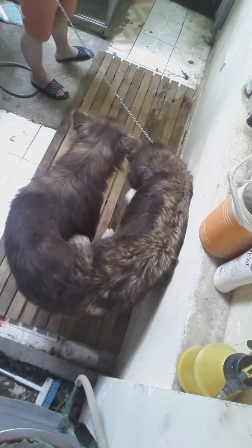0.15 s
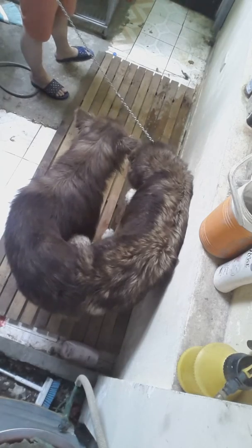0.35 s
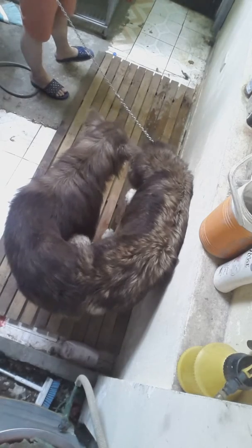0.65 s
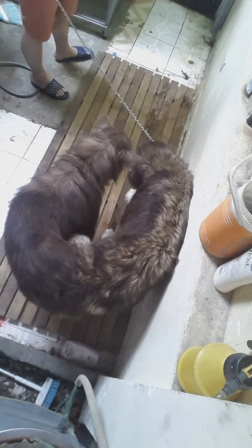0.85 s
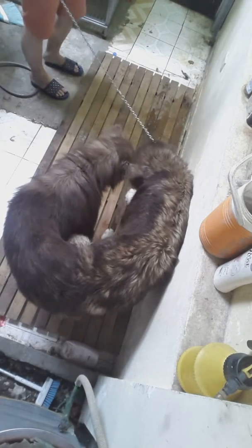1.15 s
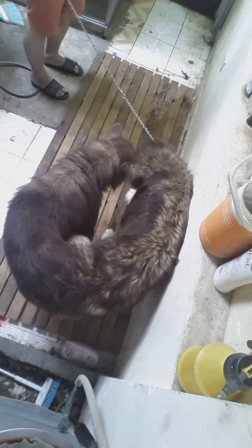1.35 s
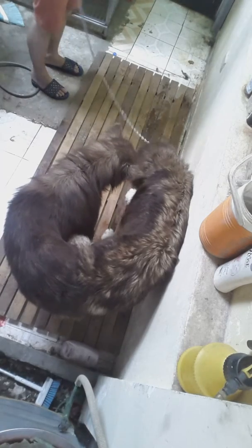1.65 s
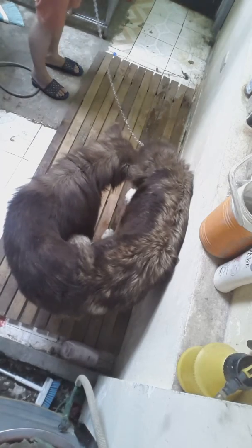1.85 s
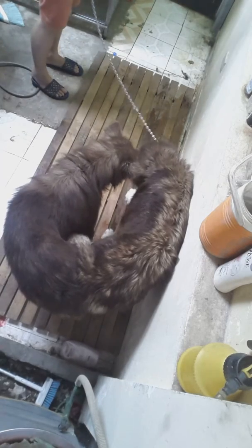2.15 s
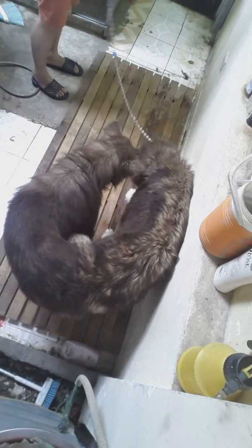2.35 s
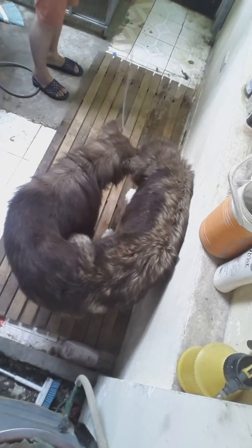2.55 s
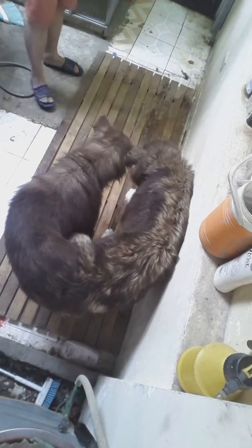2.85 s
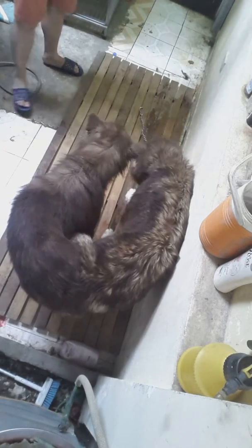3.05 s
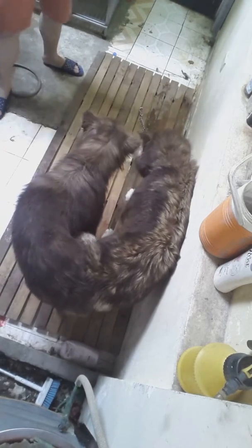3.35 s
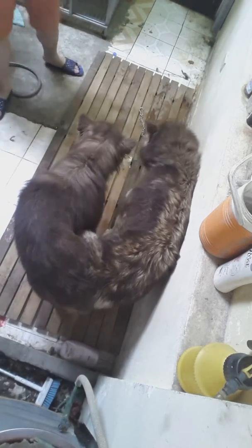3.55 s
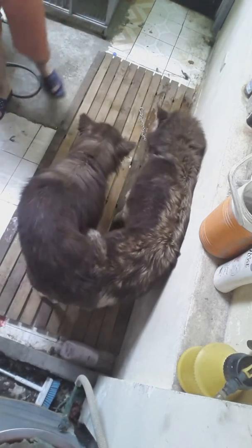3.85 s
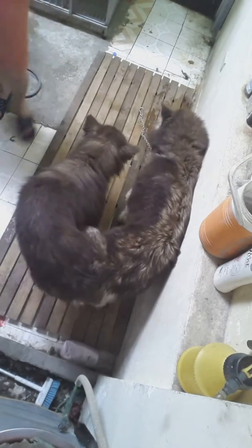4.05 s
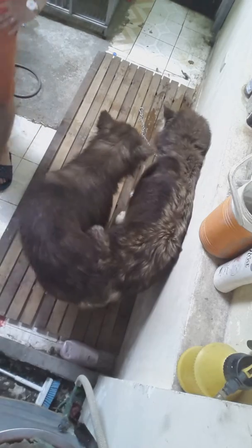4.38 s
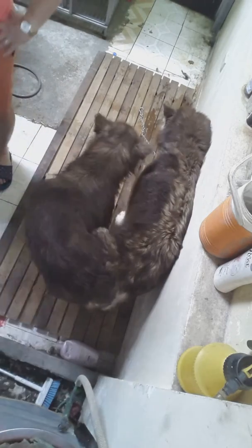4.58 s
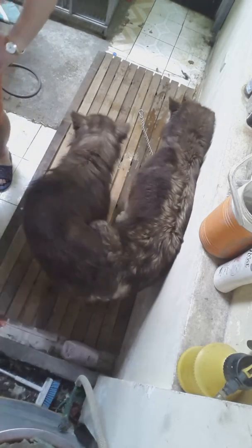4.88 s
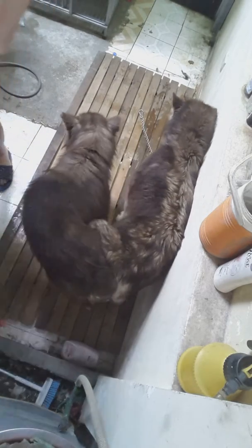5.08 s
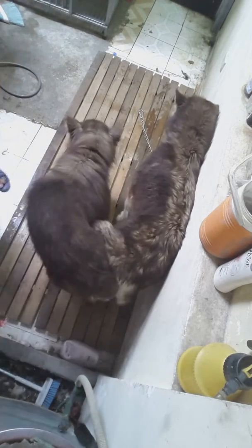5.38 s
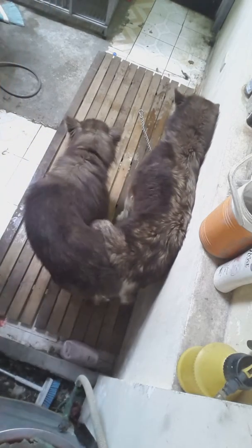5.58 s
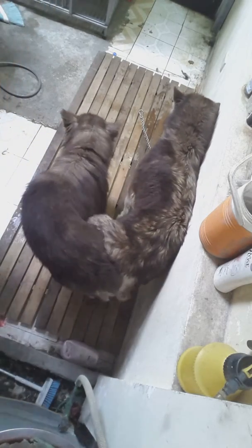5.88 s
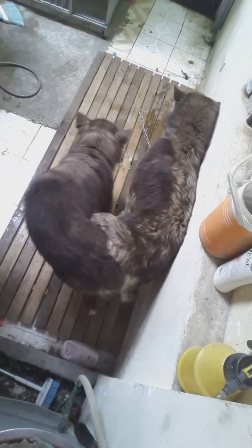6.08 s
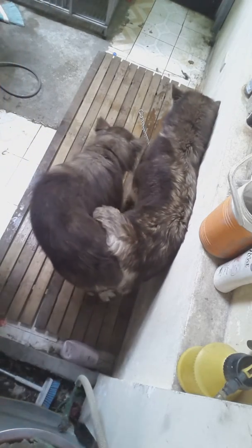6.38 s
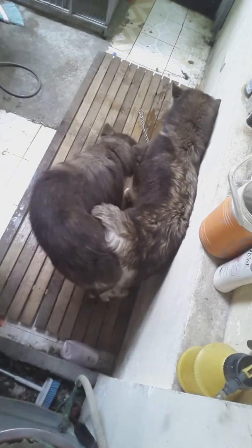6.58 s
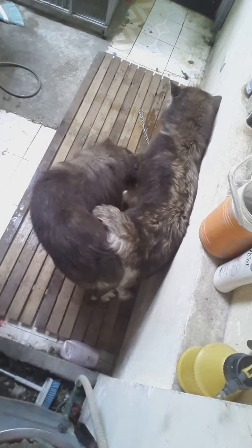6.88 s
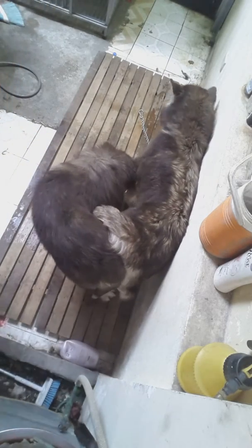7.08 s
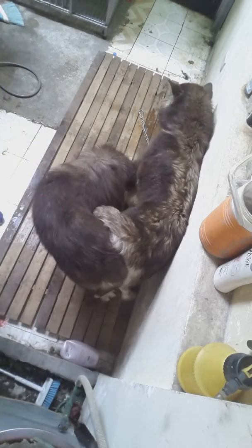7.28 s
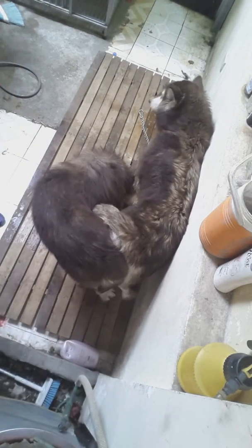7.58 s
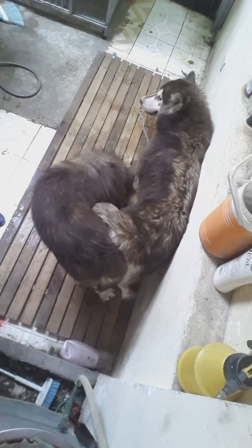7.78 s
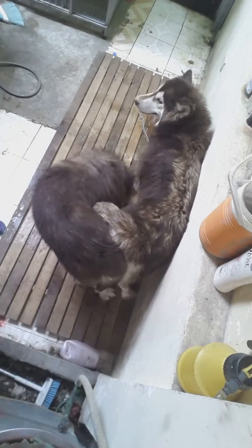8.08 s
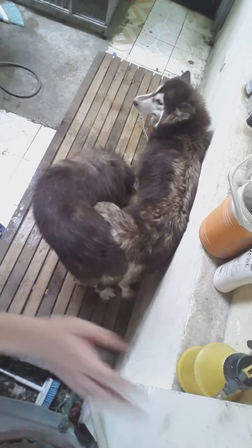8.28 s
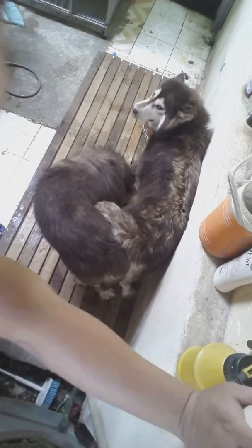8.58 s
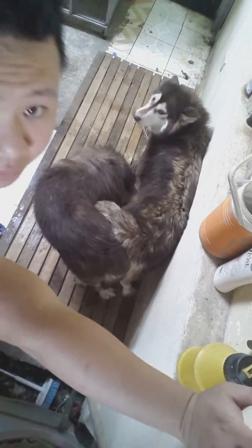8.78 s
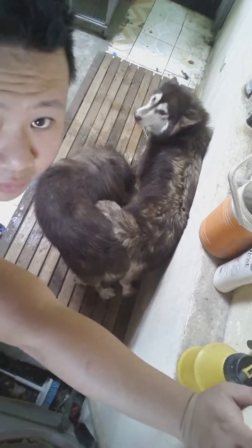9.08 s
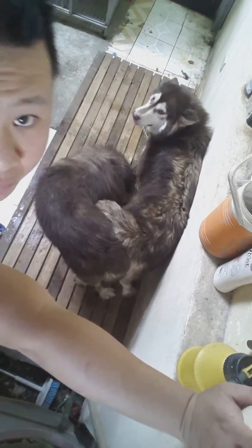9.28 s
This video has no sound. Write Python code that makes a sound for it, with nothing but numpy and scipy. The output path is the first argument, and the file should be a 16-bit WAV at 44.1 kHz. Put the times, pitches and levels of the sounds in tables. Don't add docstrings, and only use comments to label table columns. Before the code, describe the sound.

Throughout, two fans blow in a tiled wash room: broad air rush, low casing hum and steady whines near 1.1 kHz that surge slightly and beat together. From 1 to 2.5 seconds there are small sharp ticks, faint fur and cloth rustles and one tiny high chime. At 2.76 a metal chain crashes onto wooden slats: a bright crack, dense link clatter, clasp rattle and hollow wood knocks. The stereo phone microphone ducks abruptly, bass nearly vanishing briefly; a loose end follows at 3.0, and the fan noise steps back up from 3.6 to full by about 4.1. A light rattle at 4.48 leads to a second fall at 4.53, small bounces, and a third sharp fall at 4.8. Short drags scrape from 5.2 to 5.5. Afterward the fans dominate, with soft rustles near 6, 7.1 and 8.7, a faint chime at 8.2 and sparse ticks until past 9.

```python
import sys
import numpy as np
from scipy import signal
from scipy.fft import rfft, irfft, next_fast_len
from scipy.io import wavfile
from scipy.ndimage import uniform_filter1d

SR = 44100
rng = np.random.default_rng(int(sys.argv[2]) if len(sys.argv) > 2 else 0)


def decibels_to_gain(level_db):
    exponent = np.asarray(level_db, float) / 20
    return 10 ** exponent


def store_wav(level_fs):
    pcm = np.round(np.clip(np.atleast_2d(level_fs), -1, 1) * 32767)
    wavfile.write(sys.argv[1], SR, pcm.T.astype(np.int16))


N = 415863
T = np.arange(N) / SR
PADDED = next_fast_len(N)
HZ = np.maximum(np.fft.rfftfreq(PADDED, 1 / SR), 1)


def unit(x):
    return x / np.sqrt(np.mean(x ** 2))


def over_hz(points):
    hz, value = np.transpose(points)
    return np.interp(np.log(HZ), np.log(hz), value, left=value[0], right=value[-1])


def bell(hz, width):
    return 1 / np.sqrt(1 + ((HZ - hz ** 2 / HZ) / width) ** 2)


def colour(x, gain):
    return irfft(rfft(x, PADDED) * gain, PADDED)[..., :N]


def walk(rate):
    k = int(SR / rate)
    steps = np.repeat(rng.standard_normal(N // k + 1), k)
    return 1.3 * uniform_filter1d(uniform_filter1d(steps, k), k)[:N]


def diffuse():
    # (frequency [Hz], likeness [0-1])
    likeness = [(60, 1), (130, 0.91), (290, 0.94), (630, 0.34), (1370, 0), (2980, 0), (6510, 0), (14200, 0)]
    like = np.clip(over_hz(likeness), 0, .95)
    mid, side = rfft(rng.standard_normal((2, PADDED)))
    mid = mid * np.sqrt((1 + like) / 2)
    side = side * np.sqrt((1 - like) / 2)
    return irfft(np.array([mid + side, mid - side]), PADDED)[:, :N]


def grit(rate, scatter_db, smear_s):
    hits = (rng.random(N) < rate / SR) * decibels_to_gain(scatter_db * rng.exponential(size=N))
    smeared = signal.lfilter([1], [1, -np.exp(-1 / (smear_s * SR))], hits ** 2)
    return unit(np.sqrt(smeared))


def ring(modes):
    return unit(colour(diffuse(), sum(decibels_to_gain(db) * bell(hz, width) ** 2 for hz, width, db in modes)))


def ducking():
    rest_db, duck_db, step_db = 0.52, -13, -3.5
    duck_s, held_until_s = 2.752, 3.64
    step_s, creep_s = .13, .3
    corners = np.cumsum([duck_s - .01, .02, held_until_s - duck_s - .01, step_s, creep_s])
    return np.interp(T, corners, [rest_db, duck_db, duck_db, step_db, rest_db])


def falls(rows, law, own=False):
    layer_db, rise_s, share = law
    power = 0
    for s, db, hold_s, fade_db, *own_db in rows:
        age = np.maximum(T - s, 0)
        fade = share * fade_db * np.maximum(age - hold_s, 0)
        level_db = db + layer_db + own * sum(own_db) - fade
        power = power + (decibels_to_gain(level_db) * (1 - np.exp(-age / rise_s))) ** 2
    return np.sqrt(power)


def chain(links, hiss):
    # (time [s], clatter [dB], tumbling [s], fade [dB/s], link ring [dB])
    drops = [
        (2.763, -17, 0.087, 107, -25),
        (2.99, -28.5, 0.057, 138, -19.5),
        (4.478, -41, 0.0092, 300, -6),
        (4.495, -32.5, 0.035, 300, -8),
        (4.529, -24, 0.063, 97, -20.5),
        (4.68, -31, 0.017, 100, -40),
        (4.74, -33.5, .03, 144.5, -38),
        (4.789, -25.5, 0.063, 147, -22),
    ]
    # (time [s], clatter [dB], tumbling [s], fade [dB/s], fine hiss [dB])
    scuffs = [
        (5.19, -39, 0.058, 130, -10),
        (5.32, -40.5, 0.046, 200, -12.5),
        (5.366, -37.5, .03, 89, -22),
        (5.49, -43, 0.03, 253, -29),
    ]
    # (time [s], level [dB], tumbling [s], fade [dB/s])
    clasp_falls = [
        (2.79, -17.5, 0.034, 107),
        (2.97, -28.5, 0.083, 133),
        (4.49, -32.5, .03, 200),
        (4.529, -20.5, 0.055, 88),
        (4.797, -23, 0.047, 140),
        (5.19, -50, .02, 108),
        (5.368, -32.5, 0.022, 99),
        (5.48, -48, 0.039, 200),
    ]
    # (frequency [Hz], density [dB per Hz])
    clatter_tone = [(2500, -23.5), (3500, -2.5), (5200, 0), (6500, -8.5), (8500, -15), (10500, -24),
                    (14500, -46)]
    # (frequency [Hz], width [Hz], level [dB])
    slats = [(890, 280, -13), (1085, 680, 7), (1400, 164, -17.5), (2100, 1760, 10)]
    # (frequency [Hz], width [Hz], level [dB])
    clasp = [(2860, 430, 14), (3500, 1100, 10.5)]
    # (level over the clatter [dB], build-up [s], share of the fade)
    clatter_law, clasp_law = (0, 0.0011, 1), (0, 0.0017, 1)
    slat_law, dragged_slat_law = (2.9, 0.004, .75), (3.5, .02, 0.68)
    ring_law, hiss_law = (8.7, 0.011, 0.94), (4, .004, 1.2)

    tumble = grit(900, 1.3, 0.008)
    clatter = tumble * unit(colour(diffuse(), decibels_to_gain(over_hz(clatter_tone))))
    out = falls(drops + scuffs, clatter_law) * clatter
    slat_level = falls(drops, slat_law) + falls(scuffs, dragged_slat_law)
    out += slat_level * tumble * ring(slats)
    out += falls(clasp_falls, clasp_law) * tumble * ring(clasp)
    out += falls(drops, ring_law, own=True) * links
    return out + falls(scuffs, hiss_law, own=True) * hiss


def crack():
    # (time [s], peak [dB], frequency [Hz], decay [s])
    first_link = (2.7632, -3.5, 5400, .0022)
    s, db, hz, decay_s = first_link
    age = np.maximum(T - s - np.array([[0], [2 / SR]]), 0)
    level = decibels_to_gain(db + np.array([[1], [-1]]))
    return level * np.exp(-age / decay_s) * np.sin(2 * np.pi * hz * age)


def knocks():
    # (time [s], level [dB], frequency [Hz], width [Hz], time to fade 60 dB [s])
    blows = [(2.766, -18.5, 1610, 30, 0.63), (2.77, -21.5, 1433, 70, 0.85), (2.85, -22.5, 900, 150, 0.48),
             (4.53, -18, 980, 70, 0.22), (4.545, -28.5, 1900, 80, 1), (4.792, -17.5, 1025, 120, 0.39),
             (4.821, -20, 1945, 80, 0.26), (3.43, -47, 2100, 900, 1), (3.77, -45, 3500, 3500, 1),
             (3.975, -44, 3970, 3500, 0.53), (4.11, -45, 3500, 3500, 0.7)]
    out = np.zeros((2, N))
    for s, db, hz, width, t60 in blows:
        age = np.maximum(T - s, 0)
        level = decibels_to_gain(db - 60 * age / t60) * (1 - np.exp(-age / 0.0011))
        out += level * ring([(hz, width, 0)])
    return out


def ticks(hiss):
    # (time [s], peak [dB], centre [Hz], time to fade 60 dB [s], fine hiss [dB])
    taps = [(1.051, -34.5, 5040, 0.86, -20), (1.3093, -31, 6400, 0.53, -16), (1.4082, -35, 4800, 0.9, -26),
            (1.93, -37, 4830, 0.91, -20), (2.2554, -35.5, 4800, 0.86, -17.5),
            (2.507, -36.5, 5040, 0.95, -14.5), (2.764, -17.5, 5470, 0.3, -9.5),
            (3.4694, -47, 5040, 0.34, -12), (3.7694, -48, 5620, 0.21, -11), (3.9749, -34, 5260, 0.24, -24),
            (4.381, -34.5, 4520, 0.3, -11), (4.4814, -29, 4740, 0.4, -10.5), (4.798, -8.5, 5280, 0.43, -31),
            (5.1884, -19.5, 4800, 0.2, -29), (5.4745, -29, 4900, 0.45, -24), (5.6317, -31, 5030, 0.81, -16),
            (5.9594, -46, 4900, 0.23, -7), (8.1897, -36, 5270, 0.5, -15),
            (8.5494, -38.5, 4830, 0.17, -10.5), (8.5894, -43, 5500, 0.44, -9),
            (8.6688, -38.5, 5560, 0.24, -12), (9.1, -36, 4800, 0.33, -22)]
    out, noise = np.zeros((2, N)), diffuse()
    length = SR // 2
    age = np.arange(length) / SR
    for s, db, hz, t60, hiss_db in taps:
        i = int(s * SR)
        n = min(length, N - i)
        tail = decibels_to_gain(-60 * age[:n] / max(t60, .02))
        band = signal.butter(2, [hz / 1.35, hz * 1.166], "bandpass", fs=SR, output="sos")
        body = signal.sosfilt(band, noise[:, i:i + n])
        body = body * (1.1 * tail + 0.55 * np.exp(-age[:n] / 0.00078))
        fine = decibels_to_gain(hiss_db) * tail ** 1.4 * hiss[:, i:i + n]
        out[:, i:i + n] += decibels_to_gain(db) * (body + fine)
    return out


def chimes(links):
    # (time [s], peak [dB], time to fade 60 dB [s])
    strikes = [
        (2.5082, -41.5, 0.33),
        (3.4655, -57, 0.63),
        (3.6194, -70, 0.46),
        (3.7694, -67, 0.35),
        (3.9739, -65, 0.35),
        (8.2207, -42, 0.34),
    ]
    return links * sum((T >= s) * decibels_to_gain(db - 6 - 60 * np.maximum(T - s, 0) / t60) for s, db, t60 in strikes)


def rustle():
    # (loudest at [s], level [dB], swell [s], fade [s])
    swells = [(1.06, -55.5, 0.078, 0.37), (1.316, -43.5, .03, .12), (1.5, -55.5, 0.092, 0.43),
              (3.82, -59, 0.19, 0.084), (3.99, -70, .05, .08), (4.45, -53, .1, 0.041),
              (5.99, -54, 0.062, 0.19), (7.096, -51.5, 0.24, 0.27), (7.4, -58, 0.15, 0.085),
              (8.15, -58, 0.095, 0.15), (8.684, -53, 0.25, 0.6), (9.15, -58, .2, 0.46)]
    floor_db = -59
    power = decibels_to_gain(floor_db + ducking() + 1.4 * walk(7.8)) ** 2
    for s, db, swell_s, fade_s in swells:
        away = np.where(T < s, (s - T) / swell_s, (T - s) / fade_s)
        power = power + decibels_to_gain(db - 12 * away) ** 2
    grain = unit(colour(diffuse(), bell(8030, 6000) ** 2))
    return np.sqrt(power) * grit(500, 1.3, 0.0089) * grain


def fan(motor, kicks, orders):
    whine_order = 75
    slow_hz, surge_s, *favour = motor
    surge = 0
    for s, hz in kicks:
        age = np.maximum(T - s, 0) / surge_s / 3
        surge = surge + hz * (age * np.exp(1 - age)) ** 3
    turn = 2 * np.pi * np.cumsum(slow_hz + surge) / SR / whine_order
    out = np.zeros((2, N))
    for multiple, left_db, right_db, shift in orders:
        chance_db = 1.1 * walk(4)
        looseness = min(multiple / whine_order, 1)
        sway = .1 * looseness * walk(5)
        flutter = .3 * looseness * walk(9)
        is_whine = multiple == whine_order
        left, right = (chance_db + is_whine * slope * (surge - surge.mean()) for slope in favour)
        out[0] += decibels_to_gain(left_db + left) * np.sin(multiple * turn + flutter - sway)
        out[1] += decibels_to_gain(right_db + right) * np.sin(multiple * turn + flutter + shift + sway)
    return np.sqrt(2) * out


def motors():
    # (multiple of shaft rate, left [dB], right [dB], phase of right [rad])
    orders_a = [(5, -56, -56, 0.1), (8, -59, -58, 0.1), (15, -46.5, -47.5, 0.1), (16, -46, -46, 0.1),
                (30, -51, -52, 0.2), (74, -58, -56, 1.1), (75, -35.5, -31, 0.55), (76, -46, -34, 1.3),
                (150, -64, -67, 1.1)]
    orders_b = [(75, -37, -38.5, 1.8)]
    # (time [s], rise of the whine [Hz])
    kicks_a = [(-0.05, 7.6), (0.97, 7.5), (1.71, 7.0), (2.23, 7.8), (3.21, 7.0), (4.19, 6.6), (4.95, 6.4),
               (5.7, 7.4), (6.42, 7.2), (7.45, 7.0), (8.2, 7.6), (8.94, 7.0)]
    kicks_b = [(-.3, 2.5), (.2, 6.3), (.93, 5.8), (1.55, 2.5), (1.9, 4.5), (2.6, 4), (3.35, 7.3), (3.8, 2),
               (4.17, 5.5), (5.15, 3.8), (5.95, 6.2), (6.5, 4.3), (7.0, 1.5), (7.42, 5.2), (8.42, 3.8)]
    # (slowest whine [Hz], surge time [s], room's favour left, right [dB per Hz above the mean])
    motor_a, motor_b = (1131.09, .115, .48, .66), (1150, .13, .3, .3)
    return fan(motor_a, kicks_a, orders_a) + fan(motor_b, kicks_b, orders_b)


def rush():
    # (frequency [Hz], density [dB per Hz])
    air_tone = [(25, -98), (40, -84), (62, -72), (120, -62), (180, -63), (320, -61), (550, -63), (750, -68),
                (1100, -69), (1500, -74), (3000, -79), (6000, -88), (9000, -99), (11000, -101.5),
                (14800, -104.5)]
    # (frequency [Hz], width [Hz], boost [dB])
    casing = [(120, 1.3, 7), (237.65, 7.6, 18.5), (342, 10, 1.5), (455.5, 16.5, 8.5), (714.4, 7.8, 8),
              (938, 27, 5.5), (1547, 290, -3.5), (1787, 190, 3), (2350, 3200, 3)]
    gain = decibels_to_gain(over_hz(air_tone)) * np.sqrt(SR / 2)
    for hz, width, db in casing:
        gain = gain * (1 + (decibels_to_gain(db) - 1) * bell(hz, width) ** 2)
    air = colour(diffuse(), gain)
    low = colour(air, 1 / (1 + (HZ / 700) ** 4))
    high = colour(air, 1 / (1 + (4000 / HZ) ** 4))
    middle = air - low - high
    return low * decibels_to_gain(0.26 * walk(1.5)) + middle * decibels_to_gain(1.1 * walk(5.6)) + high * decibels_to_gain(0.65 * walk(8.4))


def hums():
    # (frequency [Hz], width [Hz], level [dB])
    hum_lines = [(1178, 27, -45.5), (948, 14, -55), (121.2, 4, -50), (155.5, 3, -58), (512, 5, -55.5),
                 (482.7, 17, -46.5), (78, 3, -74)]
    gain = sum(decibels_to_gain(db) * bell(hz, width) ** 2 / np.sqrt(width) for hz, width, db in hum_lines)
    return colour(diffuse(), gain * np.sqrt(2 * SR / np.pi))


def scene():
    # (frequency [Hz], width [Hz], level [dB])
    link_modes = [(9600, 250, -5), (12000, 210, 1.5), (14250, 110, -2.5)]
    # (frequency [Hz], left minus right [dB])
    port_balance = [(60, 0), (400, 0), (1250, 2.5), (2300, 0), (4220, 5), (7750, -3.5), (14200, 1)]
    links, hiss = ring(link_modes), ring([(10500, 8100, 0)])
    heard = chain(links, hiss) + crack() + knocks() + ticks(hiss)
    heard = heard + chimes(ring(link_modes[1:2])) + rustle()
    near = heard * decibels_to_gain(-ducking())
    air = rush() + hums()
    air[0] = np.roll(air[0], 2)
    tilt = over_hz(port_balance) / 2
    return motors() + colour(air + near, decibels_to_gain(np.array([tilt, -tilt])))


def band_limit(x):
    return signal.sosfilt(signal.butter(12, 14830, fs=SR, output="sos"), x)


def record(dry):
    # (from [s], until [s], level [dB], lingering level [dB], recovery [s])
    choke = (2.79, 2.915, -32, -7, .2)
    start, end, choke_db, linger_db, back_s = choke
    corners = [start - .01, start + .01, end, end + .015, end + back_s]
    bass_db = np.interp(T, corners, [0, choke_db, choke_db, linger_db, 0])
    x = .95 * np.tanh(dry * decibels_to_gain(ducking()) / .95)
    bass = colour(x, 1 / (1 + (HZ / 185) ** 12))
    mix = x + (decibels_to_gain(bass_db) - 1) * bass
    return band_limit(mix)


dry = scene()
out = record(dry)
store_wav(out)
```